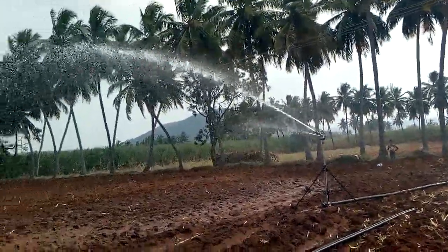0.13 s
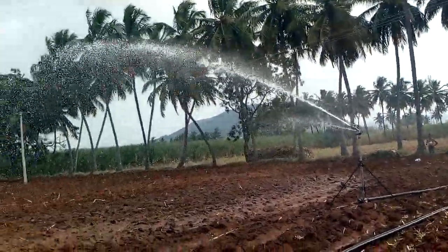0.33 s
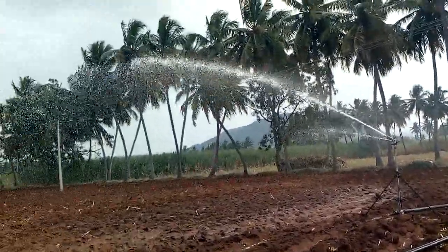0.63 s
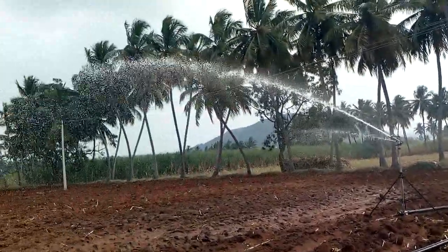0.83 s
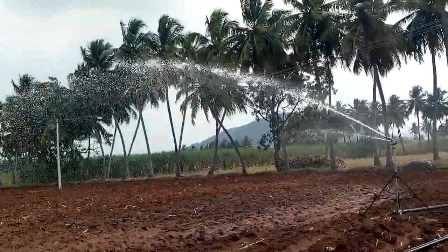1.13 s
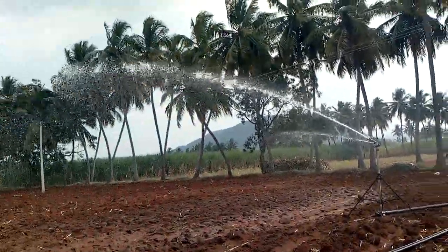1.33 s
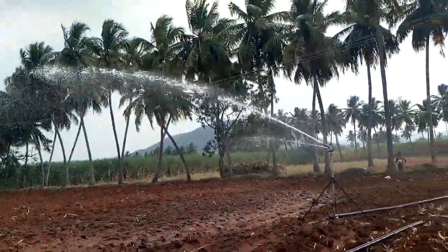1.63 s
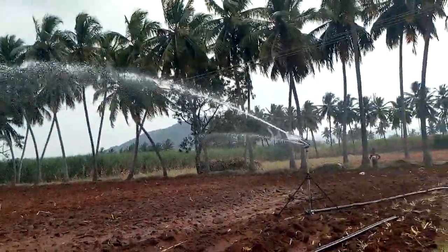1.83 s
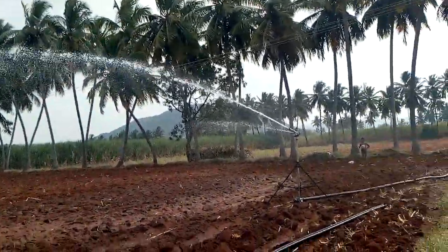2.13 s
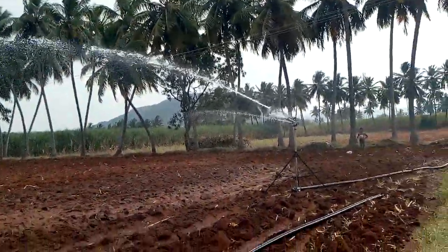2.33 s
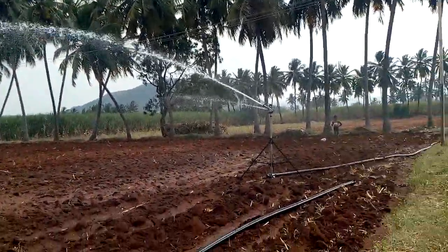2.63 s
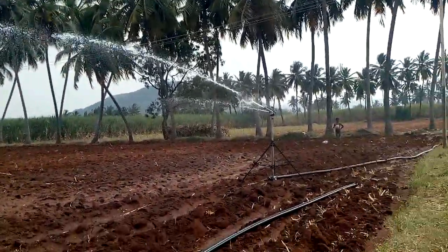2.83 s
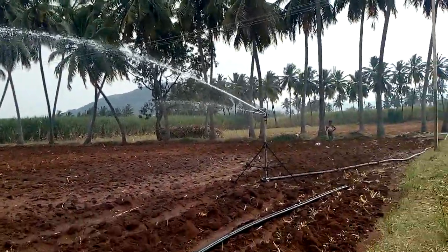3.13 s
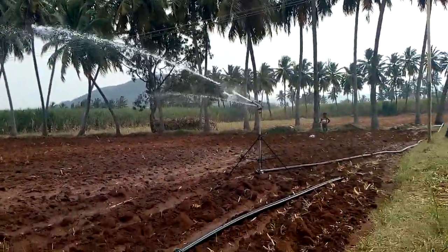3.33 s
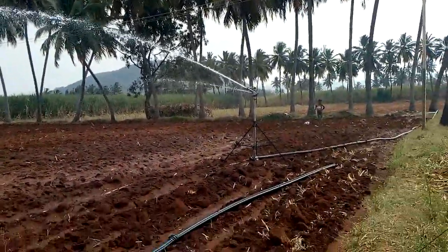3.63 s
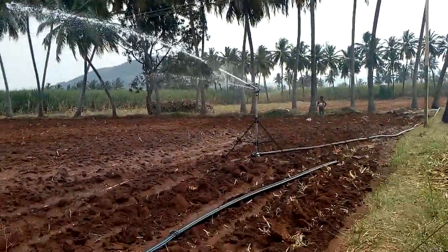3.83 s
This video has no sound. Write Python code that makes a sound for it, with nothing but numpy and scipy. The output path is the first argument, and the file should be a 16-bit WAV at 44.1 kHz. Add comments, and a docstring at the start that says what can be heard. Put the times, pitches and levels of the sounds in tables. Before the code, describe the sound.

Regular metallic ticks and splashes from a large hissing sprinkler, with gusts rumbling on the microphone.

```python
"""A rain gun sprinkler runs in a field, to the right. From the start the jet hisses, drops patter on the
soil and gusts buffet both microphone ports; a far bird calls at 0.1 s. About every 0.48 s the arm swings
into the jet, knocks on the metal head and throws off a short splash. Gusts slap the left port at 1.3 s,
then move to the right one. At 2.8 s the bird calls again; the hiss eases and the gusts go on."""
import sys
import numpy as np
from scipy import signal
from scipy.fft import rfft, irfft
from scipy.io import wavfile
from scipy.ndimage import uniform_filter1d

SR = 44100
rng = np.random.default_rng(int(sys.argv[2]) if len(sys.argv) > 2 else 0)


def log_audio(samples):
    """Write samples as a 16-bit WAV file to the path given in sys.argv[1]."""
    # one column per channel
    frames = np.atleast_2d(samples).T
    # limit to full scale, then quantise
    limited = np.clip(frames, -1, 1)
    pcm = np.round(limited * 32767).astype(np.int16)
    wavfile.write(sys.argv[1], SR, pcm)


N = 176400
T = np.arange(N) / SR

# arm blows: start_s, knock_db, ping_db, splash_db, after_ring_db
ARM_BLOWS = [(-.016, -2, -12, -6, -42), (.4604, -3, -14, 1, -42), (.9418, -2, -5, 0, -54),
             (1.424, 2, 2.5, 0, -53), (1.901, -1, -1, -3, -49), (2.383, 1, -.5, .5, -48),
             (2.862, 0, 0, 2.5, -43), (3.3464, 0, 1.5, 3, -51), (3.820, 0, -1.5, 2, -50)]
# modes of arm and head: pitch_hz, struck_db, splashed_db, t60_s
HEAD_MODES = [(1000, -31, -2, .08), (1760, -13, -4, .04), (1900, -21, -6, .03), (2110, -14, -3, .035),
              (2447, -23, -2, .11), (2820, -28, -3, .1), (3108, -20, -5, .06), (3410, -19, -4, .05),
              (3670, -18, -4, .04), (3960, -12, 7, .04), (4100, 5, 11, .032), (4740, -13, 6, .035),
              (5095, -13, 2, .04), (5467, -31, -1, .11), (6068, -13, 4, .04)]
# low modes follow the knock, high modes the ping: pitch_hz, ping_share
MODE_PING_SHARE = [(3100, 0), (4100, 1)]
# contact noise: freq_hz, density_db
CRACK_SPECTRUM = [(500, -39), (1000, 15), (1400, 11), (1900, 9.5), (3000, 12), (4500, 4), (6300, 5),
                  (9000, -26), (16000, -22)]
# water off the arm: freq_hz, density_db
SPLASH_SPECTRUM = [(500, -26), (950, 7.5), (1400, -6.5), (1900, 2), (2700, 5.5), (3500, 2.5), (4500, 4),
                   (6000, -1), (7500, -3.5), (10000, -36), (16000, -4)]
# dulling at the left port: freq_hz, gain_db
LEFT_SHADOW = [(900, -5), (2000, -3), (3000, -5), (4100, -9.5), (7000, -15), (15000, -20)]
# delay at the left port: time_s, lag_s
LEFT_LAG = [(0, .00014), (4, .00002)]
# jet hiss envelope: time_s, level_db
SPRAY_ENVELOPE = [(0, -53.5), (.2, -50.5), (1.0, -54), (1.13, -51.5), (1.3, -53), (1.8, -54), (2.4, -55.5),
                  (3.1, -56), (4, -57.5)]
# jet hiss: freq_hz, density_db
SPRAY_SPECTRUM = [(300, -6.5), (900, -1.5), (1500, -8), (2300, -1), (3100, -2), (4000, 2), (5800, 1.5),
                  (7200, 2), (8300, -5.5), (10800, -15), (13000, -12), (14500, -5), (15500, -4)]
# dulling of the jet at the left port: freq_hz, gain_db
SPRAY_SHADOW = [(400, -5), (1500, -4.5), (3000, -8), (6000, -16.5), (10000, -14), (15000, -20)]
# big drops close by: start_s, level_db, left_gain_db
BIG_DROPS = [(0.146, -38, -20), (.42, -40, -16), (.817, -38, -11), (1.062, -46, -8), (2.481, -43, -14),
             (3.134, -50, -12), (3.23, -47, -16), (3.93, -46, -9)]
# tick of a big drop: freq_hz, density_db
BIG_DROP_SPECTRUM = [(1000, -25), (3500, 2), (6500, 6), (9000, -10), (15000, -27)]
# wind pressure, left port: time_s, level_db
LEFT_PRESSURE = [(0.0, -23.5), (0.12, -34.5), (0.23, -23.5), (0.56, -33.5), (0.67, -22.5), (0.87, -47),
                 (0.92, -30), (1.0, -49), (1.24, -42.5), (1.3, -20.5), (1.43, -24.5), (1.57, -40.5),
                 (1.68, -28), (1.76, -34), (1.86, -68), (1.93, -38.5), (2.02, -54), (2.1, -36), (2.17, -51),
                 (2.32, -63), (2.41, -50), (2.59, -56), (2.66, -46.5), (2.9, -41.5), (2.93, -55),
                 (3.33, -49.5), (3.5, -53), (3.58, -34.5), (3.8, -52), (4.0, -55)]
# wind pressure, right port: time_s, level_db
RIGHT_PRESSURE = [(0.0, -32), (0.06, -22), (0.19, -34.5), (0.33, -29.5), (0.4, -34), (0.56, -35),
                  (0.66, -26.5), (0.83, -30), (0.88, -37), (1.06, -38), (1.19, -57.5), (1.36, -37),
                  (1.41, -50), (1.47, -30.5), (1.56, -36.5), (1.6, -26.5), (1.99, -25), (2.14, -45.5),
                  (2.18, -31), (2.235, -44), (2.26, -27.5), (2.37, -40), (2.53, -38.5), (2.62, -28.5),
                  (2.69, -34.5), (2.77, -20.5), (2.92, -23), (2.945, -42), (3.0, -31.5), (3.1, -42),
                  (3.22, -19), (3.4, -22.5), (3.52, -26.5), (3.66, -29), (3.72, -20), (3.97, -24),
                  (4.0, -26)]
# rumble at reference pressure: freq_hz, density_db, db_per_turbulence_db
WIND_SPECTRUM = [(22, -9.5, -1.5), (39, -17.5, 0), (68.9, 2.5, 0), (103, 1.5, 0), (172.5, -2, 0.07),
                 (293, -9, 0.394), (447, -22, 0.47), (726, -36, .5), (1140, -73, .5), (1930, -95, -1.5)]
# pressure jolts: start_s, port, level_db, upper_edge_hz
WIND_SLAPS = [(.18, "left", -21, 280), (.27, "left", -18, 190), (1.29, "left", -20, 520),
              (1.302, "left", -18, 380), (1.312, "left", -17, 210), (1.333, "left", -17, 150),
              (1.613, "left", -22, 450), (1.685, "left", -20, 220), (1.707, "left", -21, 210),
              (1.583, "right", -16, 170), (1.623, "right", -18, 150), (1.732, "right", -17, 150),
              (1.897, "right", -19, 200), (2.25, "right", -15, 170), (2.766, "right", -15, 220),
              (2.798, "right", -17, 270), (2.909, "right", -18, 350), (2.918, "right", -13, 120),
              (2.972, "right", -26, 480), (2.997, "right", -24, 280), (3.3, "right", -15, 200),
              (3.333, "right", -17, 400), (3.362, "right", -17, 280), (3.422, "right", -16, 210),
              (3.772, "right", -16, 340), (3.886, "right", -16, 380), (3.92, "right", -16, 330),
              (3.968, "right", -14, 230)]
# two notes per call: start_s, length_s, start_hz, end_hz, level_db
BIRD_NOTES = [(.108, .042, 4150, 3450, -51), (.168, .085, 2850, 2950, -53), (2.768, .042, 3900, 3520, -54),
              (2.812, .045, 3000, 2830, -60)]


def from_db(db):
    """Decibels to gain."""
    return 10 ** (np.asarray(db) / 20)


def unit_rms(x):
    """Scale to rms 1."""
    return x / np.sqrt(np.mean(x ** 2) + 1e-20)


def in_time(rows):
    """Table to a piecewise linear curve over T."""
    return np.interp(T, *np.transpose(rows))


def at_hz(rows, hz, column=1):
    """Table lookup on a log-frequency axis."""
    rows = np.array(rows)
    return np.interp(np.log(np.maximum(hz, 1)), np.log(rows[:, 0]), rows[:, column])


def colour(x, spectrum, size=2048):
    """Minimum-phase filter with the given spectrum."""
    gain = from_db(at_hz(spectrum, np.arange(size // 2 + 1) * SR / size))
    cepstrum = irfft(np.log(gain))
    cepstrum[1:size // 2] *= 2
    cepstrum[size // 2 + 1:] = 0
    return signal.fftconvolve(x, irfft(np.exp(rfft(cepstrum))))[:N]


def hiss(spectrum):
    """Coloured noise, rms 1."""
    return unit_rms(colour(rng.standard_normal(N), spectrum))


def drift(corner_hz, hop=40, settle=2000):
    """Low-passed random curve, rms 1."""
    pole = np.exp(-2 * np.pi * corner_hz * hop / SR)
    white = rng.standard_normal(N // hop + settle + 2)
    slow = signal.lfilter([1], [1, -2 * pole, pole * pole], white)[settle:]
    return np.interp(np.arange(N) / hop, np.arange(len(slow)), unit_rms(slow))


def decay(age_s, t60_s):
    """Exponential fall; zero before onset."""
    return (age_s >= 0) * np.exp(-np.log(1000) * np.clip(age_s / t60_s, 0, 10))


def ring(x, hz, t60_s):
    """Resonator: a unit click gives a decaying unit sine."""
    radius, angle = np.exp(-np.log(1000) / (t60_s * SR)), 2 * np.pi * hz / SR
    return signal.lfilter([0, np.sin(angle)], [1, -2 * radius * np.cos(angle), radius ** 2], x + 1e-18)


def left_delay(x):
    """Later arrival at the left port; the lag shrinks as the microphone turns."""
    return np.interp(T - in_time(LEFT_LAG), T, x)


def from_the_right(x):
    """Stereo pair, left duller and later."""
    return np.array([left_delay(colour(x, LEFT_SHADOW)), x])


def sprinkler(splash_db=-46, rattle_db=-83, scatter_db=-3):
    """The arm strikes the head; the splash hisses and keeps the metal ringing."""
    flow = splash_flow()
    water = from_db(rattle_db) * flow * rng.standard_normal(N)
    rattle = sum(from_db(db) * ring(water, hz, t60_s) for hz, _, db, t60_s in HEAD_MODES)
    metal, contact = arm_knocks()
    ringing = metal + rattle + after_ring()
    crack = contact * hiss(CRACK_SPECTRUM)
    splash = from_db(splash_db) * flow
    out = from_the_right(ringing + crack + splash * hiss(SPLASH_SPECTRUM))
    out[0] += from_db(scatter_db) * splash * colour(hiss(SPLASH_SPECTRUM), LEFT_SHADOW)
    return out


def arm_knocks(metal_db=-16, crack_db=-19, crack_t60_s=.0096, rise_s=.0033,
               rebound_s=(.008, .02), rebound_db=-17, spread_db=2.2, detune=.002):
    """Each blow and its rebound land a little differently. Returns head ring, contact envelope."""
    blows = [row[:3] for row in ARM_BLOWS]
    rebounds = [(start_s + rng.uniform(*rebound_s), knock_db + rebound_db, ping_db + rebound_db)
                for start_s, knock_db, ping_db in blows]
    metal, contact = np.zeros((2, N))
    for start_s, knock_db, ping_db in blows + rebounds:
        span = (T >= start_s) & (T < start_s + .5)
        age_s = T[span] - start_s
        rise = 1 - np.exp(-age_s / rise_s)
        contact[span] += from_db(knock_db) * rise * decay(age_s, crack_t60_s)
        for k, (hz, struck_db, _, t60_s) in enumerate(HEAD_MODES):
            drive_db = knock_db + (ping_db - knock_db) * at_hz(MODE_PING_SHARE, hz)
            gain = (-1) ** k * from_db(drive_db + struck_db + spread_db * rng.standard_normal())
            pitch_hz = hz * (1 + detune * rng.standard_normal())
            metal[span] += gain * rise * decay(age_s, t60_s) * np.sin(2 * np.pi * pitch_hz * age_s)
    return from_db(metal_db) * metal, from_db(crack_db) * contact


def splash_flow(entry_s=.013, entry_db=-6, hold_s=.03, t60_s=.11, rough_db=3.5):
    """Water off the arm: a little on entering the jet, a burst at the blow, a quick fall."""
    flow = 0
    for start_s, _, _, splash_db, _ in ARM_BLOWS:
        age_s = T - start_s
        entry = from_db(entry_db) * (age_s > -entry_s) * (age_s < 0)
        burst = (age_s >= 0) * (age_s < hold_s)
        flow += from_db(splash_db) * (entry + burst + decay(age_s - hold_s, t60_s))
    return flow * from_db(rough_db * drift(81))


def after_ring(pitch_hz=2820, length_s=.065, waver_db=1.0, waver_hz=18):
    """One mode swells and dies after each blow, while the arm is in the jet."""
    swell = sum(from_db(db) * np.sin(np.pi * np.clip((T - start_s) / length_s, 0, 1))
                for start_s, *_, db in ARM_BLOWS)
    swell *= from_db(waver_db * drift(60))
    hz = pitch_hz + waver_hz * drift(58.4)
    return swell * np.sin(2 * np.pi * np.cumsum(hz) / SR)


def spray(drops_per_s=370, spread_db=2, drop_t60_s=.007, patter_db=-2.5, flutter_db=-.43, coherence=.5):
    """The jet hisses; single drops tick on the soil."""
    sizes = from_db(spread_db * np.minimum(rng.exponential(1, N), 5))
    impacts = sizes * (rng.random(N) < drops_per_s / SR)
    pole = np.exp(-np.log(1000) / (drop_t60_s * SR))
    patter = from_db(patter_db) * unit_rms(signal.lfilter([1], [1, -pole], impacts + 1e-18))
    level = from_db(in_time(SPRAY_ENVELOPE) + flutter_db * drift(8)) * np.hypot(1, patter)
    right = hiss(SPRAY_SPECTRUM)
    left = coherence * left_delay(right) + np.sqrt(1 - coherence ** 2) * hiss(SPRAY_SPECTRUM)
    return level * np.array([colour(left, SPRAY_SHADOW), right])


def big_drops(t60_s=.008):
    """Big drops land close by: dry ticks on the soil."""
    envelope = sum(from_db([[db + left_gain_db], [db]]) * decay(T - start_s, t60_s)
                   for start_s, db, left_gain_db in BIG_DROPS)
    return envelope * hiss(BIG_DROP_SPECTRUM)


def wind(pressure, reference_db, gain_db=1.5, buffet_db=2.5, eddy_db=9, patchy_db=2.5, evenness=.16):
    """Lumpy rumble on one port; pressure and eddies brighten it."""
    pressure_db = in_time(pressure) + buffet_db * drift(52.4)
    turbulence_db = pressure_db - reference_db + eddy_db * eddies()
    edges_hz = 20 * 2 ** np.arange(0, 7, .5)
    white = rng.standard_normal((2, N + SR // 4))
    calm, rumble = np.zeros((2, N))
    for k, (low_hz, high_hz) in enumerate(zip(edges_hz, edges_hz[1:])):
        centre_hz = np.sqrt(low_hz * high_hz)
        bandpass = signal.butter(3, [low_hz, high_hz], "band", fs=SR, output="sos")
        band = signal.sosfilt(bandpass, white[k % 2])[-N:]
        band *= from_db(at_hz(WIND_SPECTRUM, centre_hz) + patchy_db * drift(19.6))
        calm += band
        rumble += band * from_db(turbulence_db * at_hz(WIND_SPECTRUM, centre_hz, column=2))
    swell = np.sqrt(uniform_filter1d(unit_rms(calm) ** 2, size=2000) + 1e-9)
    return from_db(gain_db + pressure_db) * rumble / calm.std() / swell ** evenness


def eddies(puffs_per_s=38, sigma_s=.003):
    """Puffs strike the port, uneven in strength and spacing; mean 0."""
    gaps, sizes = rng.uniform([.3, .2], [1.7, 1.5], (400, 2)).T
    onsets = (np.cumsum(gaps) / puffs_per_s * SR).astype(int)
    impulses = np.bincount(onsets[onsets < N], sizes[onsets < N], N)
    puffs = signal.fftconvolve(impulses, signal.windows.gaussian(1001, sigma_s * SR), "same")
    return puffs - puffs.mean()


def wind_slaps(gain_db=3, energy_s=.005, port_low_hz=75, port_high_hz=780,
               flutter_gain=.11, flutter_t60_s=.035):
    """A pressure jolt thumps one port; the air flutters on briefly."""
    out, age_s = np.zeros((2, N + SR)), T[:SR // 10]
    for start_s, port, db, edge_hz in WIND_SLAPS:
        jolt = rng.choice([-1, 1]) * (age_s == 0)
        slap = jolt + flutter_gain * decay(age_s, flutter_t60_s) * rng.standard_normal(len(age_s))
        for order, hz, kind in ((3, edge_hz, "low"), (7, port_high_hz, "low"), (3, port_low_hz, "high")):
            slap = signal.sosfilt(signal.butter(order, hz, kind, fs=SR, output="sos"), slap)
        slap *= np.sqrt(energy_s * SR / np.sum(slap ** 2))   # energy of rms 1 held for energy_s
        onset = int(start_s * SR)
        out[int(port == "right"), onset:onset + len(slap)] += from_db(gain_db + db) * slap
    return out[:, :N]


def bird(waver_db=4, waver_hz=70):
    """Far whistles; each note glides unsteadily, swells and fades."""
    out = 0
    for start_s, length_s, start_hz, end_hz, db in BIRD_NOTES:
        progress = np.clip((T - start_s) / length_s, 0, 1)
        hz = start_hz + (end_hz - start_hz) * progress + waver_hz * drift(145)
        envelope = np.sqrt(np.abs(np.sin(np.pi * progress))) * from_db(db + waver_db * drift(66))
        out += envelope * np.sin(2 * np.pi * np.cumsum(hz) / SR)
    return from_the_right(out)


def scene():
    """Stereo sum: sprinkler, water and bird in the field, wind at the ports."""
    field = sprinkler() + spray() + big_drops() + bird()
    slaps = wind_slaps()
    rumble = [wind(LEFT_PRESSURE, reference_db=-28.5), wind(RIGHT_PRESSURE, reference_db=-25.5)]
    return field + slaps + np.array(rumble)


def record(dry, cutoff_hz=15700):
    """Soft clip of the strongest gusts, then a steep low-pass."""
    lowpass = signal.ellip(12, .1, 80, cutoff_hz, fs=SR, output="sos")
    return signal.sosfilt(lowpass, np.tanh(dry))


dry = scene()
out = record(dry)
log_audio(out)
```